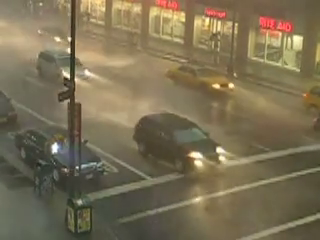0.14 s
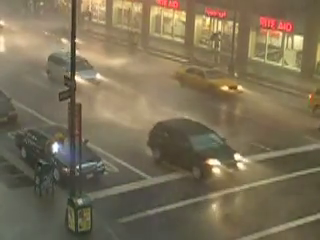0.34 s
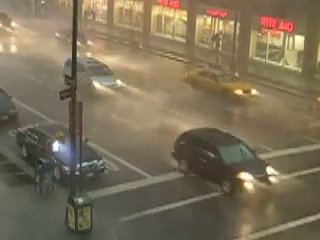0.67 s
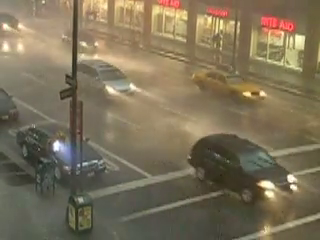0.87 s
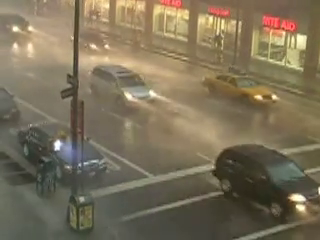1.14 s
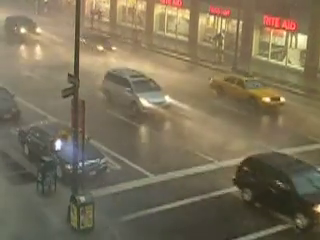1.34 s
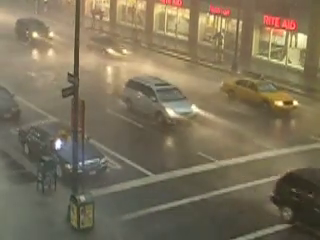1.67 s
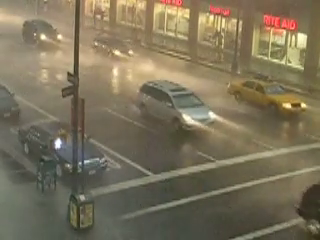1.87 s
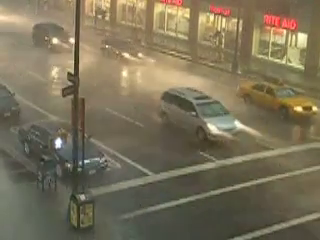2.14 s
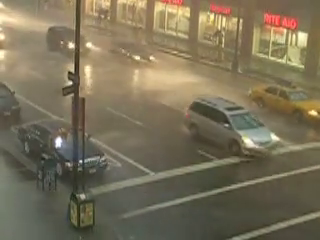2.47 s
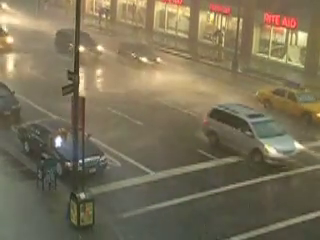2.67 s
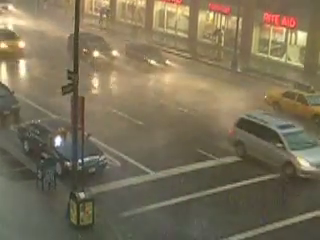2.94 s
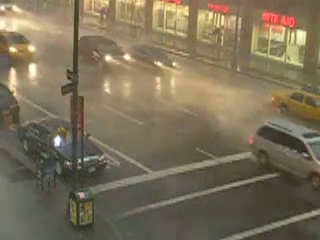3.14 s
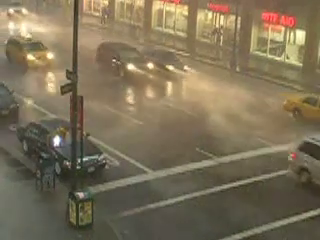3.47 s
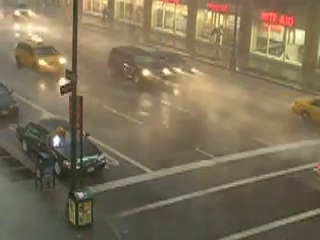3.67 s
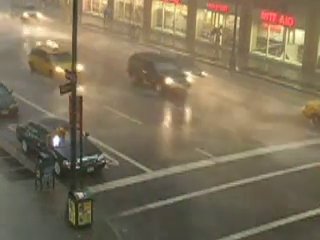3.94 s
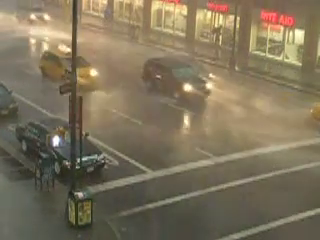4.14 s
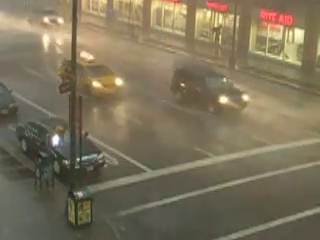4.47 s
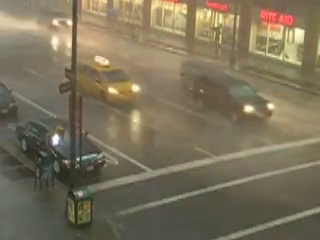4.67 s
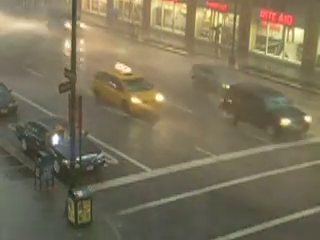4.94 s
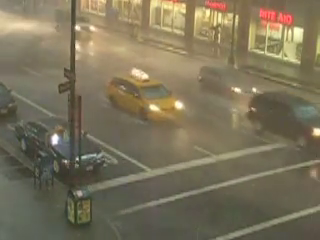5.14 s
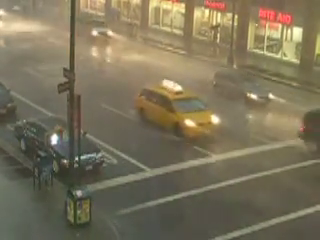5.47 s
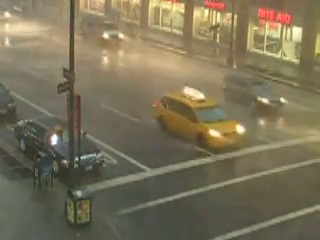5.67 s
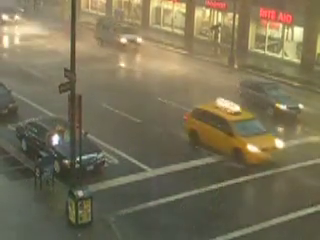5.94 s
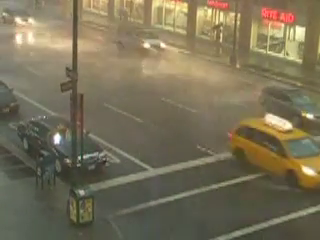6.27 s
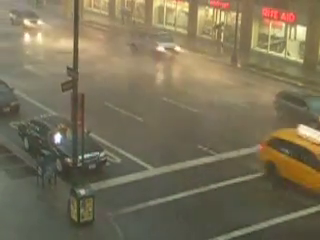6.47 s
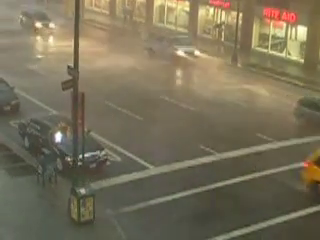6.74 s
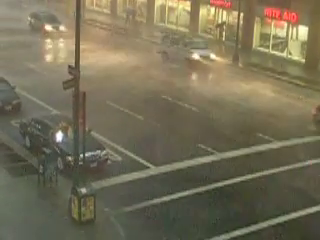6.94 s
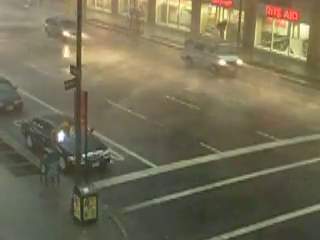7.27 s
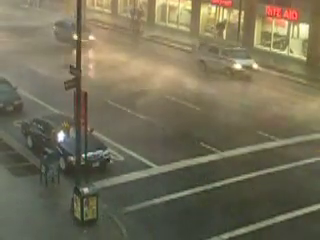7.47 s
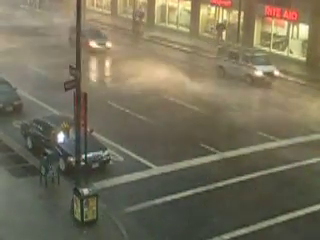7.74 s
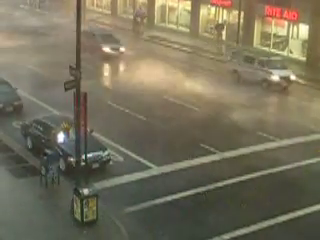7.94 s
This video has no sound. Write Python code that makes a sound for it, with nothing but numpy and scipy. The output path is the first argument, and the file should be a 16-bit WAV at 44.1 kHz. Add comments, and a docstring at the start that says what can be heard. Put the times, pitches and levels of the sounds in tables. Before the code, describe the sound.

From the start, heavy rain makes a dense, dull hiss with fine patter, over a low traffic drone, heard from an upper window. A distant car horn, steady in pitch but wavering in strength through echoes, holds until about 0.8 seconds, then fades out by 1.5. A car washes through water near 0.7. At 1.4 thunder breaks with a low roll and dull crackle, surging again around 2, 2.2, 2.6 and 2.9 seconds; automatic gain squeezes the rain back. Spray from cars swells near 2.1 and 3.3, with engine rumble underneath. The thunder grows duller, with weaker peals at 4.5 and 5.6 echoing between buildings. Further wet passes come around 4.1, 5.5, 6.5 and 7.8 as rain regains prominence, continuing to the end near 8. The sound is muffled and limited, with brief level dips and scattered faint, sharp ticks.

```python
"""A downpour on a city street, heard from an upper window: countless drop impacts merge into filtered-noise hiss.
Passing cars throw up spray over a drone and rumble; a horn, a sum of harmonics, sounds down the block.
Thunder, clumped shocks shaped into roll and crackle, breaks at 1.4 s and echoes between the buildings.
The camera's gain control then pushes the hiss back and a limiter holds the peaks of its narrow band.
Faint ticks, filtered impulses, sound above that band."""
import sys
import numpy as np
from scipy.fft import rfft, irfft, next_fast_len
from scipy.io import wavfile
from scipy.ndimage import uniform_filter1d, minimum_filter1d, map_coordinates

SR = 44100
rng = np.random.default_rng(int(sys.argv[2]) if len(sys.argv) > 2 else 0)


def output_pcm(signal):
    """Save a mono or channel-first signal as 16-bit PCM at the path in sys.argv[1].

    Samples are clipped to [-1, 1] before scaling.
    """
    pcm = np.clip(np.atleast_2d(signal).T, -1, 1) * 32767
    wavfile.write(sys.argv[1], SR, np.round(pcm).astype(np.int16))


N = 356769


def amp(db):
    """Level in decibels to amplitude ratio: 20 dB is a factor of ten."""
    return 10 ** (np.asarray(db) / 20)


def unit(x):
    """Normalise the mean square, and so the rms, to 1."""
    return x / np.sqrt(np.mean(x ** 2) + 1e-20)


def curve(rows):
    """Linear interpolation of (t/s, value) points to one value per sample."""
    return np.interp(np.arange(N) / SR, *np.transpose(rows))


def wobble(rate):
    """Slow random fluctuation: a smooth spline through Gaussian knots, rate of them per second."""
    knots = rng.standard_normal(int(N * rate / SR) + 4)
    return map_coordinates(knots, [np.arange(N) * rate / SR])


def filtered(x, response):
    """Linear filtering: the spectrum of x times a zero-phase response of frequency."""
    size = next_fast_len(N + SR // 2)
    f = np.fft.rfftfreq(size, 1 / SR)
    return irfft(rfft(x, size) * response(f), size)[:N]


def coloured(x, spectrum):
    """Spectral shaping by (f/Hz, gain/dB) points on a logarithmic frequency axis, at rms 1."""
    f, db = np.transpose(spectrum)
    return unit(filtered(x, lambda hz: amp(np.interp(np.log(hz + 1), np.log(f), db))))


def impacts(per_second, spread_db):
    """Shot noise: randomly timed impulses of either sign and log-normal size, at rms 1."""
    hit = rng.random(N) < per_second / SR
    sign = np.sign(rng.standard_normal(N))
    size = amp(spread_db * rng.standard_normal(N))
    return unit(hit * sign * size)


def rain():
    """Superposition: countless far drops merge into Gaussian hiss, while nearer ones patter on top."""
    # colour of the hiss: f/Hz, relative density/dB
    hiss_colour = [(300, -34.5), (900, -12), (1800, -2), (2300, -0.5), (2850, 1), (3200, -5.5),
                   (3600, -14.5), (4000, -24.5), (4300, -39.5), (4600, -68.5)]
    # slow swelling of the downpour with the gusts: t/s, level/dB
    gusts = [(0, -18), (1.35, -16), (1.7, -19), (3, -19.5), (4.05, -17), (4.7, -20), (5.8, -20),
             (6.6, -17.5), (7.3, -18), (8.09, -17)]
    patter = amp(-7.5) * impacts(per_second=900, spread_db=2)
    drops = rng.standard_normal(N) + patter
    return amp(curve(gusts) + 1.1 * wobble(22)) * coloured(drops, hiss_colour)


def traffic():
    """Inverse-square spreading: spray grows as each car nears, over the street's drone and rumble."""
    # cars passing through standing water: t/s when nearest, wash level/dB
    cars = [(0.701, -21.5), (2.1, -18), (3.3, -16.5), (4.101, -22.5), (5.499, -30), (6.5, -24),
            (7.799, -23.5)]
    # colour of the thrown water: f/Hz, relative density/dB
    wash_colour = [(150, -25), (400, -11.5), (520, 0.5), (750, 1), (1000, 1), (1250, 1), (1420, 1.5),
                   (1900, -6), (2600, -8), (4000, -50.5)]
    # colour of the distant traffic: f/Hz, relative density/dB
    drone_colour = [(60, -35.5), (120, -9), (190, 0.5), (290, -3), (390, -5), (520, 0), (900, -18),
                    (2500, -48.5)]
    # colour of engines and road rumble: f/Hz, relative density/dB
    rumble_colour = [(20, -28), (40, -19), (60, -6.5), (82, 4), (105, 3), (135, 0), (220, -39.5)]
    # strength of engines and road rumble: t/s, level/dB
    rumble_level = [(0.6, -44), (1.1, -35.5), (1.6, -37.5), (2.1, -30), (2.7, -31), (3.5, -41), (4.35, -35),
                    (4.7, -41.5), (5.4, -37), (6.0, -41), (6.4, -35), (6.8, -44), (7.45, -36), (7.9, -42)]
    pass_s = 0.62  # time from the nearest point to half power
    drone_db = -23

    t = np.arange(N) / SR
    power = sum(amp(db) ** 2 / (1 + ((t - nearest) / pass_s) ** 2) for nearest, db in cars)
    splashes = coloured(impacts(per_second=6000, spread_db=3.5), wash_colour)
    spray = np.sqrt(power) * amp(0.87 * wobble(14)) * splashes
    drone = amp(drone_db + 0.98 * wobble(5)) * coloured(rng.standard_normal(N), drone_colour)
    rumble_gain = amp(curve(rumble_level) + 1.8 * wobble(11))
    rumble = rumble_gain * coloured(rng.standard_normal(N), rumble_colour)
    return spray + drone + rumble


def horn():
    """Harmonic series under interference: echoes off moving cars make each partial swell on its own."""
    # partials: multiple of the fundamental, relative level/dB
    partials = [(1, -29.5), (2, -28), (3, -28), (4, -34), (5, -28), (6, -35.5), (7, -32.5)]
    # strong echoes that reinforce one partial: t/s, multiple of the fundamental, lift/dB
    swells = [(.03, 5, 14.5), (.18, 5, 8), (.19, 3, 8), (.33, 1, 11.5), (.58, 5, 13.5), (.62, 3, 10),
              (.63, 1, 13.5), (.7, 3, 10), (.8, 2, 5), (.98, 2, 10), (1.33, 1, 15.5)]
    fundamental_hz, level_db = 456.3, -0.5
    hold_s, fade_db_per_s, end_s = 0.75, 14, 1.55
    swell_s = 0.036  # from the crest of a swell to 1/e of its lift

    t = np.arange(N) / SR
    fade = amp(level_db - fade_db_per_s * np.maximum(t - hold_s, 0))
    release = np.clip((end_s - t) / 0.1, 0, 1)
    pitch_hz = fundamental_hz * (1 + 0.0012 * wobble(15))
    phase = 2 * np.pi * np.cumsum(pitch_hz) / SR
    tone = np.zeros(N)
    for k, db in partials:
        swell_db = sum(lift * np.exp(-((t - s) / swell_s) ** 2) for s, multiple, lift in swells if multiple == k)
        gain = amp(db + swell_db + 2.2 * wobble(19.4))
        tone += gain * np.sqrt(2) * np.sin(k * phase + 0.5 * wobble(22))
    return fade * release * tone


def ticks():
    """Broadband impulses: needle-short ticks, each with a weaker straggler, reach above the narrow band."""
    # sharpest ticks: t/s, relative peak level/dB
    tick_times = [(0.0338, -37), (0.176, -34), (0.5891, -32), (0.607, -23.5), (0.6455, -33),
                  (0.8977, -39.5), (0.9943, -30.5), (1.4845, -25.5), (1.5977, -41.5), (2.0956, -43.5),
                  (2.1949, -30.5), (2.494, -31), (2.5267, -41.5), (2.625, -35.5), (2.8499, -38.5),
                  (2.8894, -41), (2.9439, -40.5), (2.9815, -40), (3.0934, -39), (3.5471, -36.5),
                  (3.8148, -40.5), (3.91, -36.5), (4.0525, -32), (4.1045, -34), (4.3522, -34.5),
                  (4.7044, -38.5), (5.693, -38.5), (5.879, -29.5), (6.1863, -33), (6.7456, -35.5),
                  (7.9971, -27.5)]
    # colour of the ticks: f/Hz, relative density/dB
    tick_colour = [(3500, -25), (4500, 4), (5500, 0), (7000, -2.5), (10000, -6.5), (15000, -16.5)]
    level_db = 3.5  # largest coloured peak relative to the largest impulse

    spikes = np.zeros(N)
    for (s, db), (lag, weakness) in zip(tick_times, rng.random((len(tick_times), 2))):
        spikes[round(s * SR)] += amp(db)
        # the straggler: 2 to 17 ms later, 5 to 25 dB weaker, of opposite sign
        spikes[round((s + 0.002 + 0.015 * lag) * SR)] -= amp(db - 5 - 20 * weakness)
    clicks = coloured(spikes, tick_colour)
    return amp(level_db) * clicks * spikes.max() / np.abs(clicks).max()


def peal(age):
    """Reverberant decay: the power of one peal rises quickly, falls, and leaves a long echo."""
    rise_s, fall_db_per_s = 0.14, 12
    echo_db, echo_fall_db_per_s = -9, 3  # the peal rolls on between the buildings
    rise = np.clip(age / rise_s, 0, 1)
    after = np.maximum(age - rise_s, 0)
    direct = amp(-fall_db_per_s * after) ** 2
    echo = amp(echo_db - echo_fall_db_per_s * after) ** 2
    return rise ** 2 * (direct + echo)


def thunder():
    """Propagation delay: shocks from along the lightning channel arrive in clumps, as roll and crackle."""
    # peals: t/s at onset, level/dB
    peals = [(1.39, -9.5), (1.95, -15), (2.22, -8), (2.56, -7.5), (2.92, -10), (4.48, -17), (5.6, -21)]
    # colour of the near roll: f/Hz, relative density/dB
    near_colour = [(40, -44.5), (80, -25), (110, -17), (150, -5.5), (280, -1), (330, -4.5), (410, -7),
                   (600, -28), (1500, -65)]
    # colour of the roll from further away: f/Hz, relative density/dB
    far_colour = [(40, -44.5), (80, -22.5), (110, -14), (150, -1), (210, -0.5), (280, -1), (340, -6),
                  (410, -9.5), (600, -27.5), (1500, -55.5)]
    # colour of the dull crackle: f/Hz, relative density/dB
    crackle_colour = [(200, -37.5), (400, -7.5), (480, 1), (560, -1.5), (680, -5.5), (900, -11),
                      (1400, -14.5), (3000, -46.5), (4200, -68.5)]
    crackle_db = -6  # relative to the roll

    t = np.arange(N) / SR
    strength = np.sqrt(sum(amp(db) ** 2 * peal(t - s) for s, db in peals))
    # later shocks have come further and are duller
    far = np.clip((t - 2.6) / 3, 0, 1)
    shocks = impacts(per_second=900, spread_db=3)
    near_and_far = (1 - far) * coloured(shocks, near_colour) + far * coloured(shocks, far_colour)
    clumps = wobble(30)
    roll = amp(1.7 * clumps) * near_and_far
    snaps = coloured(impacts(per_second=1200, spread_db=2.5), crackle_colour)
    crackle = amp(crackle_db + 1.9 * clumps) * snaps
    return strength * (roll + crackle)


def recess(x):
    """Resonance: standing waves in the window recess lift some bands and hollow others."""
    # resonances: f/Hz, full width at half lift/Hz, lift/dB
    modes = [(158.8, 15, 5), (179.4, 12, -6.5), (194.6, 17, 6), (235, 15, 5), (232, 14, -6),
             (265.2, 19, 3.5), (292.4, 15, 2.5), (414, 22, -6.5), (1250, 46, -4.5), (1690, 26, 1.5)]

    def response(hz):
        """Resonance curves of all modes, their lifts added in decibels."""
        return amp(sum(db / (1 + (2 * (hz - centre) / width) ** 2) for centre, width, db in modes))

    return filtered(x, response)


def scene():
    """Superposition of the street's sources, coloured by the window recess."""
    street = rain() + traffic() + horn() + thunder()
    return recess(street)[None]


def gain_control(x):
    """Level compression: the camera turns itself down when loud, so thunder pushes the rain back."""
    knee_db, window_s = -14.5, 0.16
    slope = 0.76  # dB taken off per dB over the knee
    power = np.abs(uniform_filter1d(x ** 2, round(window_s * SR)))
    over_db = np.maximum(10 * np.log10(power + 1e-12) - knee_db, 0)
    return x * amp(-slope * over_db)


def dips():
    """Amplitude modulation: the gain drops quickly at each dip and recovers exponentially."""
    # brief dips in level: t/s at onset, depth/dB
    drops = [(1.02, 7), (1.75, 4.5), (2.68, 6), (4.6, 5.5), (4.948, 5.5), (7.378, 4)]
    fall_s, recover_s = 0.02, 0.035
    t = np.arange(N) / SR
    loss_db = np.zeros(N)
    for s, depth_db in drops:
        fall = np.clip((t - s) / fall_s, 0, 1)
        recovery = np.exp(-np.maximum(t - s - fall_s, 0) / recover_s)
        loss_db += depth_db * fall * recovery
    return amp(-loss_db)


def limiter(x, ceiling, size):
    """Peak limiting: the gain drops smoothly around each peak above the ceiling, over size samples."""
    needed = np.minimum(1, ceiling / (np.abs(x) + 1e-9))
    return x * uniform_filter1d(minimum_filter1d(needed, size), size)


def record(dry):
    """Dynamic control and band limiting, then faint ticks and a constant offset from zero."""
    band_hz, top_hz = 4450, 15800
    offset = 0.0317
    held = limiter(gain_control(dry[0]) * dips(), ceiling=0.71, size=200)
    # a cutoff 200 Hz wide, centred on the band edge
    narrow = filtered(held, lambda hz: np.clip((band_hz + 100 - hz) / 200, 0, 1))
    return filtered(narrow + ticks(), lambda hz: hz < top_hz)[None] + offset


dry = scene()
out = record(dry)
output_pcm(out)
```